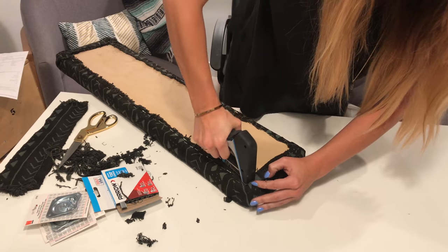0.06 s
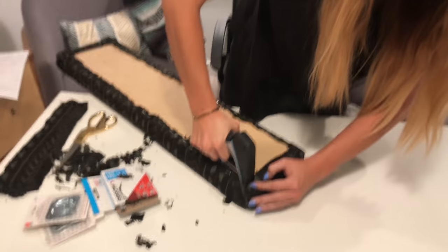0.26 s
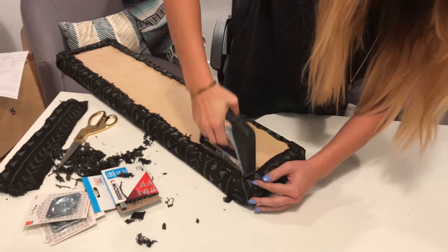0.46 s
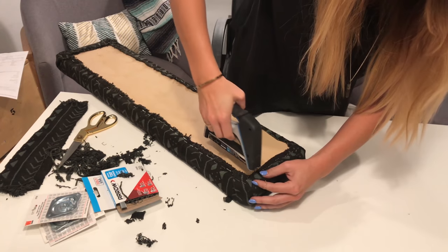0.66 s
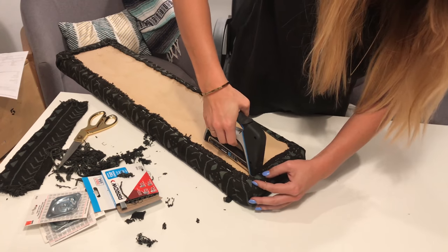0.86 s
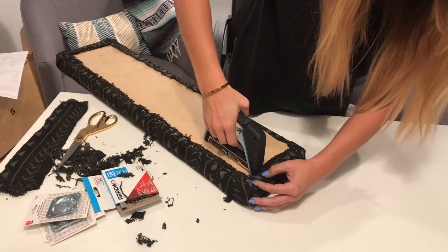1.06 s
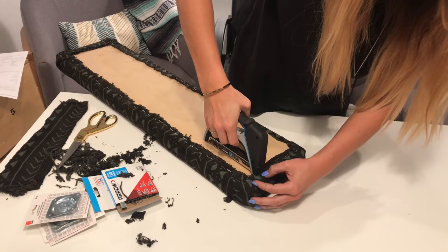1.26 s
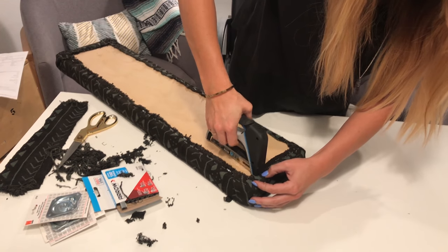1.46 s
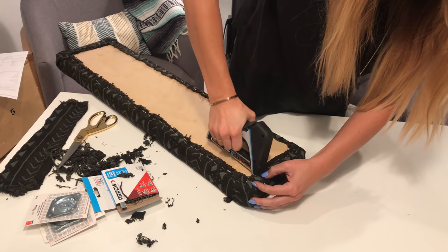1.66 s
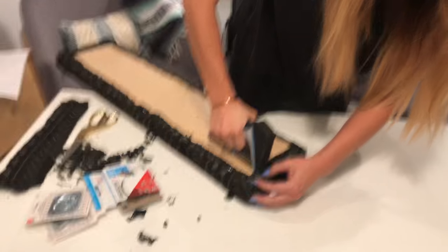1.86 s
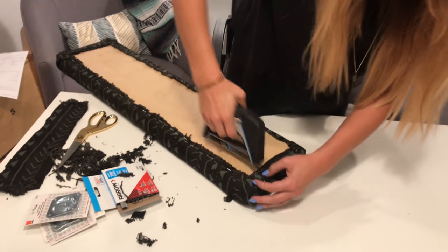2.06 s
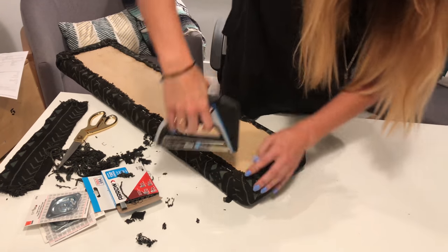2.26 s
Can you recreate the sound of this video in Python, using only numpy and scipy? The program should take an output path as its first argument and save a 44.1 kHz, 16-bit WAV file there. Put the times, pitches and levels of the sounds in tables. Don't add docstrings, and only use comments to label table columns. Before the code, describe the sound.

A hand staple gun slams twice into a fabric-covered wooden frame in a bare room

```python
import sys
import numpy as np
from scipy import signal
from scipy.io import wavfile
from scipy.ndimage import uniform_filter1d, minimum_filter1d

SR = 44100
rng = np.random.default_rng(int(sys.argv[2]) if len(sys.argv) > 2 else 0)


def store_pcm(level_fs):
    pcm = np.round(np.clip(level_fs, -1, 1) * 32767).astype(np.int16)
    wavfile.write(sys.argv[1], SR, np.atleast_2d(pcm).T)


def convert_level_to_amplitude(level_db):
    exponent = np.asarray(level_db, float) / 20
    return 10 ** exponent


N = 101429


def rms_one(x):
    return x / np.sqrt(np.mean(x ** 2) + 1e-20)


def at_hz(points, hz):
    table_hz, value = np.array(points).T
    return np.interp(np.log(hz), np.log(table_hz), value)


def ring(push, hz, t60):
    r, w = convert_level_to_amplitude(-60 / (t60 * SR)), 2 * np.pi * hz / SR
    return signal.lfilter([0, np.sin(w)], [1, -2 * r * np.cos(w), r * r], push + 1e-18)


def resonate(x, table):
    total = 0
    for hz, width, level_db in table:
        b, a = signal.iirpeak(hz, hz / width, fs=SR)
        total = total + convert_level_to_amplitude(level_db) * rms_one(signal.lfilter(b, a, x))
    return total


def bands(sources, gain):
    edges = 20 * 2 ** np.arange(0, 10.1, .5)
    total = 0
    for k, (lo, hi) in enumerate(zip(edges, edges[1:])):
        sos = signal.butter(3, [lo, hi], "band", fs=SR, output="sos")
        centre = min(np.sqrt(lo * hi), 15000)
        total = total + gain(centre) * signal.sosfilt(sos, sources[k % 2])
    return total


TOP_HZ = 15900


def top_cut(x):
    return signal.sosfilt(signal.cheby2(12, 50, TOP_HZ + 300, fs=SR, output="sos"), x)


def place(out_len, s, sound):
    out, i = np.zeros(out_len + len(sound)), max(int(s * SR), 0)
    out[i:i + len(sound)] = sound
    return out[:out_len]


# (frequency [Hz], level [dB per Hz])
ROOM_TONE = [(12, -31), (20, -2), (117, -9.5), (314, -10), (428, -17), (506, -20.5), (670, -20),
             (13200, -35.5), (16500, -41.5)]
# (frequency [Hz], level [dB rms])
HUM = [(60, -68), (119, -80.5)]
AIR_DB, AIR_HISS_DB, AIR_PATCHY_DB = -68.5, -87.5, 2


def air():
    t = np.arange(N) / SR
    settle = 8000

    def gain(hz):
        drift = uniform_filter1d(rng.standard_normal(N + settle), size=2000)
        drift = rms_one(uniform_filter1d(drift, size=2000))
        return convert_level_to_amplitude(at_hz(ROOM_TONE, hz) + AIR_PATCHY_DB * drift / (1 + hz / 800))

    tone = top_cut(bands(rng.standard_normal((2, N + settle)), gain))[settle:]
    hiss = rms_one(top_cut(np.diff(rng.standard_normal(N + 2), 2)))
    hum = sum(np.sqrt(2) * convert_level_to_amplitude(db) * np.sin(2 * np.pi * hz * t) for hz, db in HUM)
    return convert_level_to_amplitude(AIR_DB) * rms_one(tone) + convert_level_to_amplitude(AIR_HISS_DB) * hiss + hum


# (time [s], level [dB])
SQUEEZE = [
    (-.05, -76.5),
    (0.15, -73),
    (.3, -96),
    (1.2, -88.5),
    (1.479, -78.5),
    (1.52, -66),
    (1.6, -70),
    (1.68, -68),
    (1.8, -71.5),
    (1.9, -95),
]
# (frequency [Hz], width [Hz], level [dB])
LEVER = [(6250, 2500, -10.5), (810, 1100, 3.5), (3000, 5300, -1), (11000, 9100, -7)]
# (frequency [Hz], width [Hz], level [dB])
STREAKS = [(1880, 130, -3), (3600, 220, -3.5)]
SQUEEZE_DB, GRAIN_DB = 2.5, 1.5


def squeeze():
    s, db = np.transpose(SQUEEZE)
    unevenness = rms_one(uniform_filter1d(rng.standard_normal(N), size=400))
    grains = rng.standard_normal(N) * convert_level_to_amplitude(GRAIN_DB * unevenness)
    rub = rms_one(top_cut(resonate(grains, LEVER + STREAKS)))
    return convert_level_to_amplitude(np.interp(np.arange(N) / SR, s, db) + SQUEEZE_DB) * rub


# (time [s], level [dB],
# frequency [Hz], t60 [s])
KNOCKS = [(0.019, -53, 50, 0.18), (0.13, -45.5, 51, 0.16), (0.222, -12, 58, 0.13), (0.22, -17, 208, 0.26),
          (0.39, -34.5, 76, .5), (0.5, -44, 75, 0.83), (1.48, -47, 302.5, 0.16), (1.529, -51, 335, 0.19),
          (1.56, -52.5, 275, 0.25), (1.54, -54, 430, 0.18), (1.539, -52.5, 45, 0.64),
          (1.5, -55.5, 180, 0.22), (1.721, -58.5, 340, 0.23), (1.8, -47, 67, 0.38), (1.85, -27, 47, 0.23),
          (1.88, -27, 207, 0.6), (2.058, -38.5, 73.5, 0.55), (2.171, -39, 75, 0.29), (2.08, -39, 280, 0.23),
          (0.57, -27.5, 2000, .011), (2.1735, -29.5, 1370, 0.012), (2.1735, -38.5, 2200, 0.033),
          (0.22, -8, 893, 0.053), (1.875, -16, 920, .02), (1.58, -57.5, 340, 0.33)]
KNOCK_RISE_CYCLES = .6


def knocks():
    t = np.arange(SR) / SR
    out = np.zeros(N)
    for s, db, hz, t60 in KNOCKS:
        rise = 1 - np.exp(-t * (hz + 50) / KNOCK_RISE_CYCLES)
        out += place(N, s, convert_level_to_amplitude(db - 60 * t / t60) * rise * np.sin(2 * np.pi * hz * t))
    return out


# (frequency [Hz], t60 [s])
ROOM = [(60, 0.4), (250, 0.46), (1000, 0.49), (2500, 0.51), (4000, 0.51), (7000, 0.47), (10000, 0.36),
        (15000, 0.29)]
ROOM_GAP_S, ROOM_RISE_S = .002, .004
LATE_DB, LATE_STRETCH = -36.5, 1.9


def room(colour):
    t = np.arange(SR * 3 // 4) / SR

    def decay(hz):
        fall_db = 60 * t / at_hz(ROOM, hz)
        return convert_level_to_amplitude(colour(hz)) * (convert_level_to_amplitude(-fall_db) + convert_level_to_amplitude(LATE_DB - fall_db / LATE_STRETCH))

    tail = top_cut(bands(rng.standard_normal((2, len(t))), decay))
    tail = tail * (1 - np.exp(-np.maximum(t - ROOM_GAP_S, 0) / ROOM_RISE_S))
    return tail / np.sqrt(np.mean(tail[:2000] ** 2))


# (time [s], peak level [dB], brightness [dB per octave], ring scale [x], extra room [dB])
CLICKS = [(0.1520, -12, -0.4, 1.17, 3.6), (0.2103, 5.5, -3, 1.06, 1.5), (0.218, 1, 5, 1.1, -26),
          (0.5015, -38, 5.0, .6, .1), (0.5370, -43, 4.0, .6, .1), (0.5677, -23, 0, 1.1, 3),
          (1.16, -45.5, 3, 1.1, .1), (1.2100, -55, -1, .8, -11), (1.5073, -36, 4, 0.97, -2.3),
          (1.7976, -9.5, -0.1, 1.3, 1.5), (1.8670, 5, 1, 0.64, 13), (1.8757, 6, 1.2, 1.04, 4),
          (2.118, -44, 35, 0.75, 15), (2.1430, -38, -8, 0.69, -3), (2.1500, -41, 16, .6, -2),
          (2.1739, -21.5, 1.5, 1.34, -2.5)]
# (frequency [Hz], level [dB], t60 [s])
HOUSING = [(2600, -5, .007), (2900, -3, .009), (3400, -2, .009), (3950, -1, .009), (4550, 0, .012),
           (5650, -5, .010), (6900, -5, .008), (8700, -6, .007), (9700, -7, .006), (11600, -10, .005),
           (13200, -9, .005), (14900, -12, .005)]
# (frequency [Hz], level [dB per Hz])
CLICK_ECHO = [(59, -35), (100, 2.5), (602, -5), (1330, -12), (2920, -1.5), (5920, -2), (14200, -11.5),
              (15500, -19), (16500, -35)]
CONTACT_S, MODE_SPREAD_DB, CRACK_DB = 0.00038, 2, -3.5
CLICK_LOW_HZ, CLICK_ROOM_DB = 2380, -30.5


def clicks():
    out, t = np.zeros(N), np.arange(2048) / SR
    high = signal.butter(4, CLICK_LOW_HZ, "high", fs=SR, output="sos")
    for s, db, tilt_db, scale, wet_db in CLICKS:
        def tilt(hz):
            return tilt_db * np.log2(hz / 4000)

        def echo_colour(hz):
            return at_hz(CLICK_ECHO, hz) + tilt(hz)

        press = t / CONTACT_S * np.exp(-t / (CONTACT_S * scale))
        touch = rng.standard_normal((len(HOUSING) + 1, 2048)) * press
        modes = 0
        for (hz, mode_db, t60), push in zip(HOUSING, touch):
            strength, detune = rng.standard_normal(2)
            tone = rms_one(ring(push, hz * (1 + 0.01 * detune), t60 * scale))
            modes = modes + convert_level_to_amplitude(mode_db + tilt(hz) + MODE_SPREAD_DB * strength) * tone
        crack = bands(touch[[-1, 0]], lambda hz: convert_level_to_amplitude(echo_colour(hz)))
        sound = signal.sosfilt(high, rms_one(modes) + convert_level_to_amplitude(CRACK_DB) * rms_one(crack))
        if db < -30:
            sound = top_cut(sound)
        out += place(N, s - CONTACT_S / 2, convert_level_to_amplitude(db) * sound / np.abs(sound).max())
        out += place(N, s, convert_level_to_amplitude(db + wet_db + CLICK_ROOM_DB) * room(echo_colour))
    return out


# (time [s], level [dB])
SLAMS = [
    (0.2175, 2.5),
    (1.8754, -1.5),
]
# (frequency [Hz], level [dB per Hz])
SLAM_RATTLE = [(18, -40.5), (30, -2.5), (979, -15), (1150, -9), (2000, -2), (2600, -6.5), (3210, -2.5),
               (13700, -12), (16500, -23.5)]
# (frequency [Hz], level [dB per Hz])
SLAM_ECHO = [(18, -42), (30, -4.5), (493, -9.5), (625, -11), (1450, -11.5), (2400, -10), (4530, -10.5),
             (14800, -17.5), (16500, -36.5)]
# (frequency [Hz], width [Hz], level [dB])
FRAME = [(502, 360, -11.5), (1007, 340, -8.5), (1476, 160, -9.5), (2000, 240, -13), (3600, 560, -8.5),
         (4440, 100, -10)]
RATTLE_RISE_S, RATTLE_HOLD_S, RATTLE_T60_S = .0005, .022, 0.1
RATTLE_PER_S, RATTLE_DULLS_DB_PER_S, SLAM_ROOM_DB = 4000, 58, -9.5


def slams():
    out, t = np.zeros(N), np.arange(SR // 4) / SR

    def dulling(hz):
        return convert_level_to_amplitude(at_hz(SLAM_RATTLE, hz) - RATTLE_DULLS_DB_PER_S * t * np.log2(1 + hz / 2000))

    for s, db in SLAMS:
        sizes = convert_level_to_amplitude(3.1 * np.minimum(rng.exponential(1, (2, len(t))), 4))
        sizes = sizes * rng.choice([-1, 1], (2, len(t)))
        fall = convert_level_to_amplitude(-60 * np.maximum(t - RATTLE_HOLD_S, 0) / RATTLE_T60_S)
        shape = (1 - np.exp(-t / RATTLE_RISE_S)) * fall
        contacts = rng.random(len(t)) < RATTLE_PER_S / SR
        rattle = top_cut(bands(contacts * sizes * shape + 1e-18, dulling))
        out += place(N, s, convert_level_to_amplitude(db - 6.5) * rattle / np.sqrt(np.mean(rattle[:900] ** 2)))
        echo = rms_one(room(lambda hz: at_hz(SLAM_ECHO, hz)))
        echo = echo + resonate(echo, FRAME)
        out += place(N, s, convert_level_to_amplitude(db + SLAM_ROOM_DB) * echo / np.sqrt(np.mean(echo[:2000] ** 2)))
    return out


def scene():
    return (air() + squeeze() + knocks() + clicks() + slams())[None]


def falling_max(db, back_db_per_s):
    ramp = back_db_per_s * np.arange(N) / SR
    return np.maximum.accumulate(db + ramp) - ramp


def low_pass(x):
    return signal.sosfilt(signal.butter(12, 17050, fs=SR, output="sos"), x)


CEILING_DB, LIMIT_BACK_DB_PER_S = -4.5, 502.5
DUCK_FROM_DB, DUCK_DB, DUCK_HOLD_S, DUCK_BACK_DB_PER_S = -17, 9.0, .11, 54.5
CUTOFF_HZ = 16300


def record(dry):
    level = 20 * np.log10(np.abs(dry[0]) + 1e-9)
    loudness = 10 * np.log10(uniform_filter1d(dry[0] ** 2, size=441) + 1e-12)
    over = DUCK_DB * np.clip((loudness - DUCK_FROM_DB) / 2, 0, 1)
    hold = int(DUCK_HOLD_S * SR)
    late = np.r_[np.zeros(hold), over][:N]
    held = -minimum_filter1d(-over, hold | 1, origin=(hold | 1) // 2)
    duck = uniform_filter1d(np.maximum(held, falling_max(late, DUCK_BACK_DB_PER_S)), size=221)
    peaks = -minimum_filter1d(duck - level, size=61)
    cut = np.maximum(falling_max(peaks, LIMIT_BACK_DB_PER_S) - CEILING_DB, 0)
    mix = dry * convert_level_to_amplitude(-duck - uniform_filter1d(cut, size=31))
    mix = signal.sosfilt(signal.cheby2(10, 60, CUTOFF_HZ + 900, fs=SR, output="sos"), mix)
    return low_pass(mix)


dry = scene()
out = record(dry)
store_pcm(out)
```